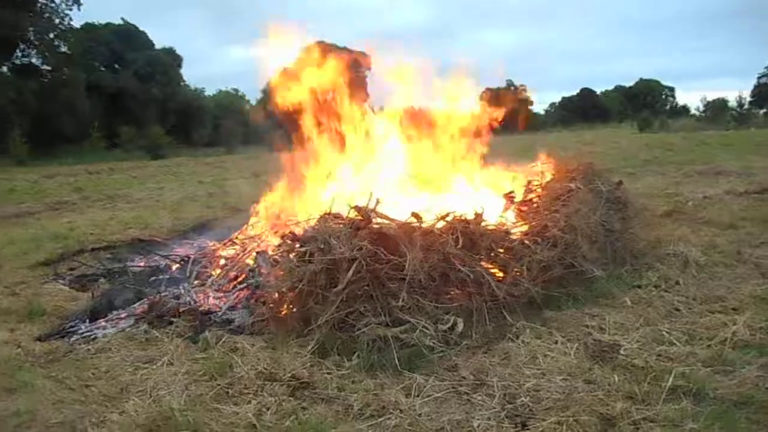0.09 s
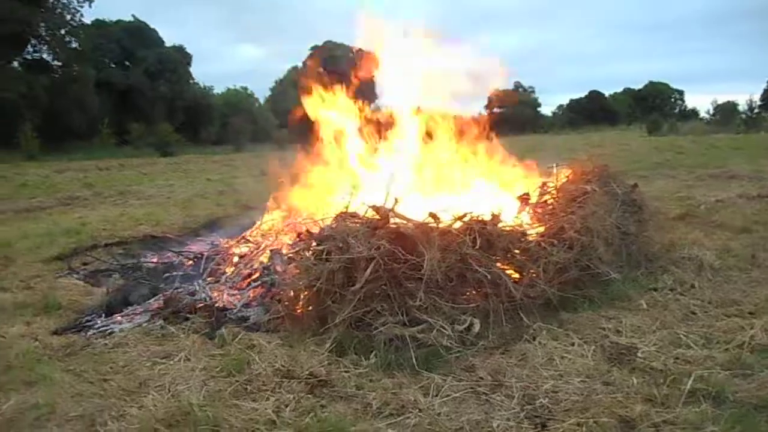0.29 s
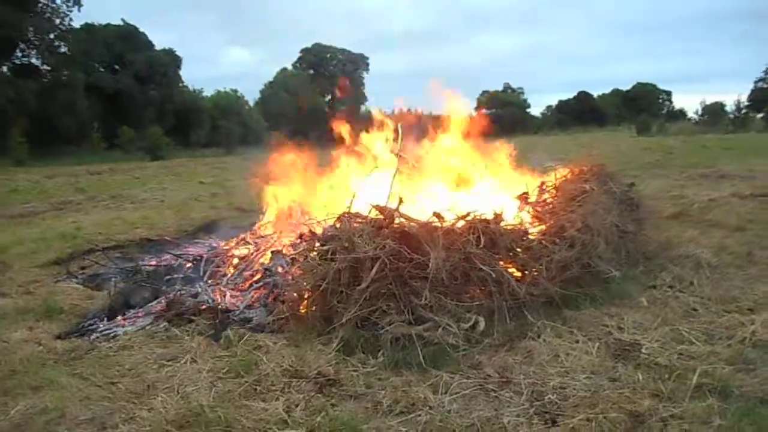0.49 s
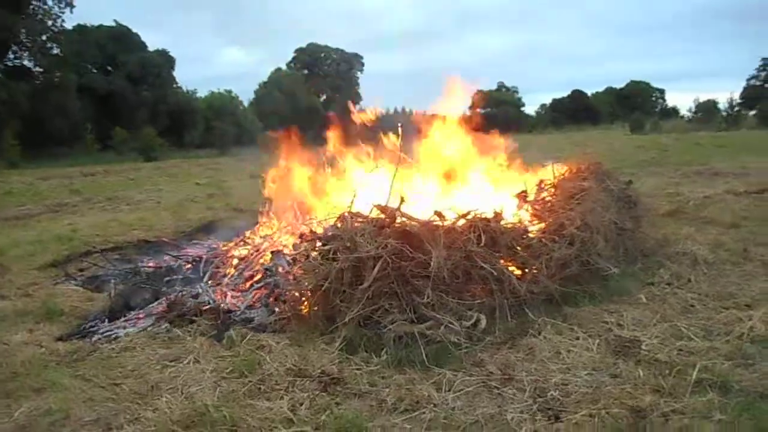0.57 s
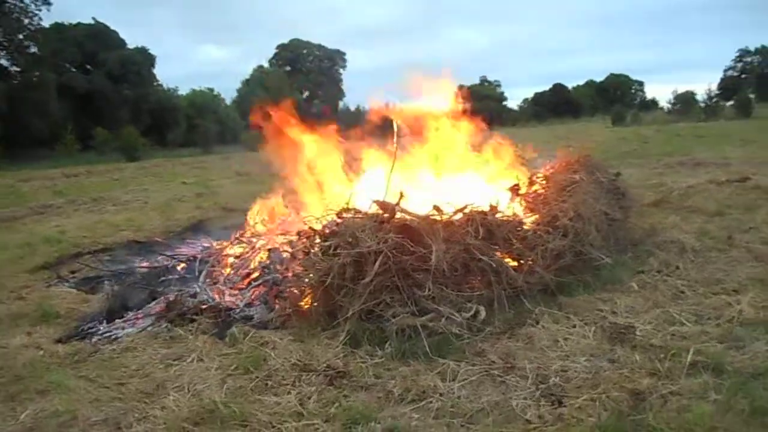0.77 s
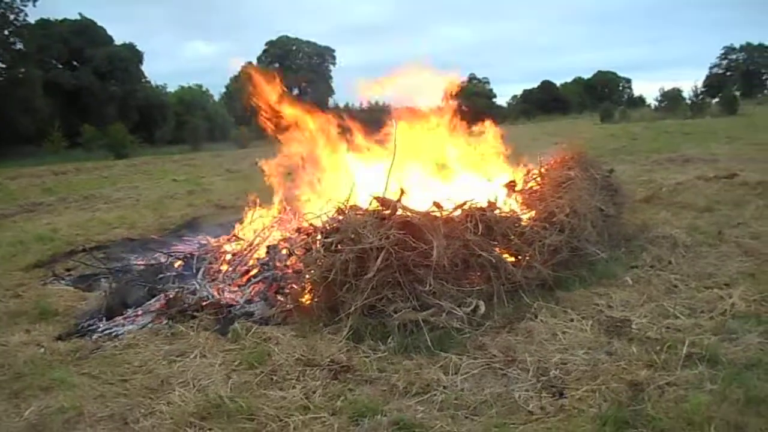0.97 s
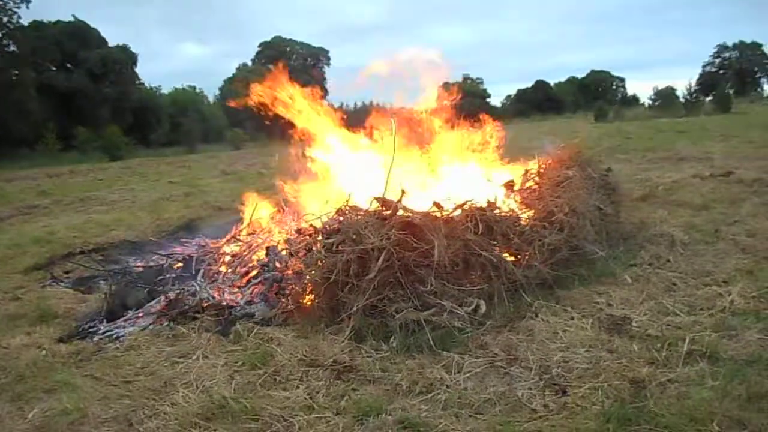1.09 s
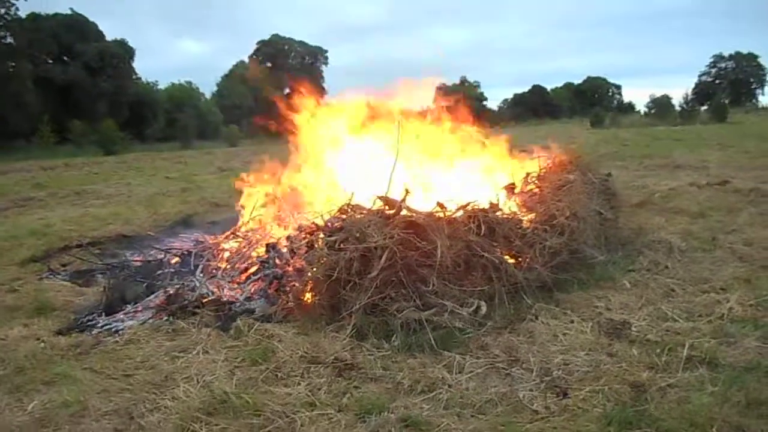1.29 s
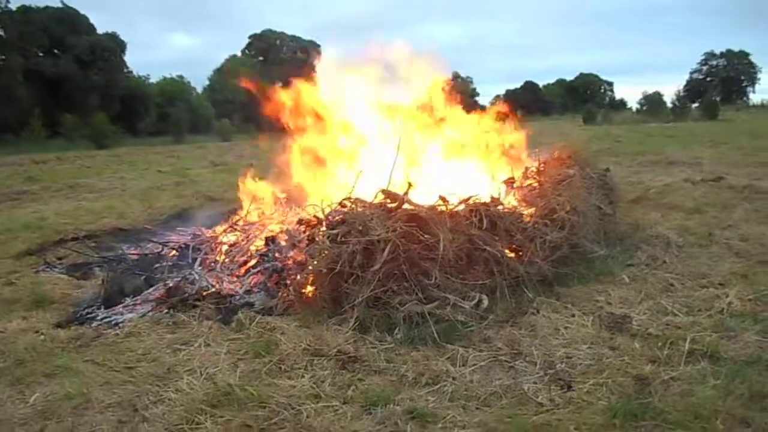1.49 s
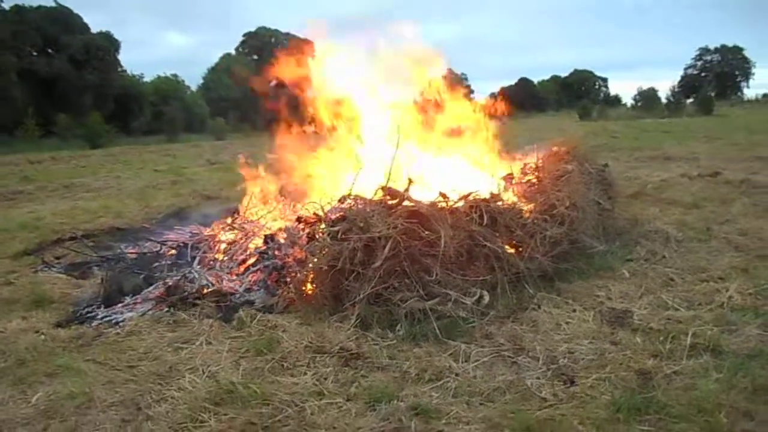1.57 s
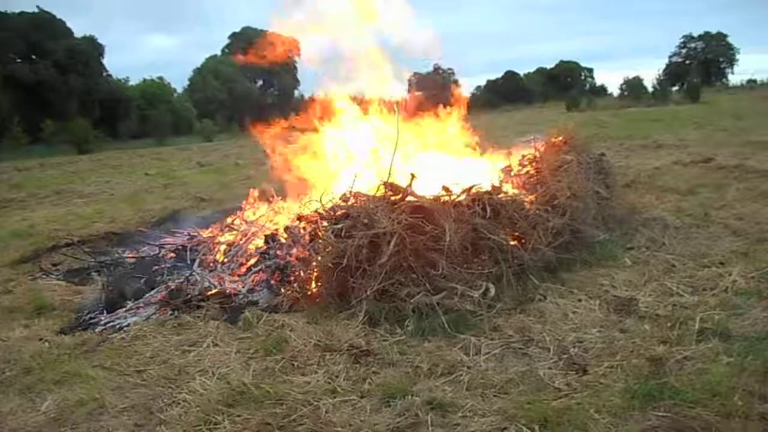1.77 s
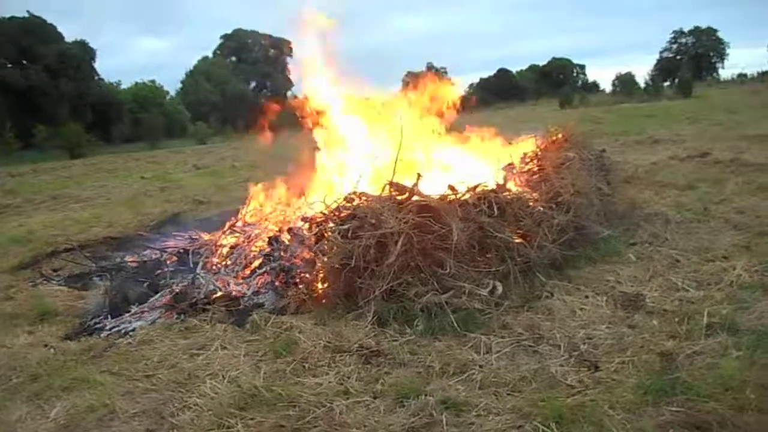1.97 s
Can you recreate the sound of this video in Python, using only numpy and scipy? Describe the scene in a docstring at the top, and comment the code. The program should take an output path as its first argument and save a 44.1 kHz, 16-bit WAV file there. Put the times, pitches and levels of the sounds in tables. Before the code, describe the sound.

A brushwood bonfire crackles close by in an open field for about two seconds. Fine random ticks run throughout over a faint steady hiss and low uneven flutter. Medium snaps come at 0.22 and 0.3, the loudest crack at 0.43, another at 0.6, a strong double snap near 0.95, soft low flame puffs around 1.1, a loud pop at 1.5, then smaller pops to the end. Dry, mono, muted extreme treble.

```python
"""Brushwood fire in an open field

A heap of dry brushwood burns a few metres from a small camera and its microphone.
The flames are shaped noise: a hiss with moving treble, an uneven low flutter, and soft puffs as short low tones.
Hollow stems burst with short ringing pops: a burst and tearing fibres excite resonances, twigs scatter them
into a tail and the ground returns them late. Countless faint crackles, made the same way, fall at random."""
import sys
import numpy as np
from scipy import signal
from scipy.fft import rfft, irfft
from scipy.io import wavfile
from scipy.ndimage import uniform_filter1d

SR = 44100
rng = np.random.default_rng(int(sys.argv[2]) if len(sys.argv) > 2 else 0)


def undo_db(level):
    """Turn decibels back into plain size, where 20 dB means ten times bigger."""
    steps = np.asarray(level, float) / 20
    return 10 ** steps


def log_audio(samples):
    """Write samples as a 16-bit WAV file to the path given in sys.argv[1]."""
    # one column per channel
    frames = np.atleast_2d(samples).T
    # limit to full scale, then quantise
    limited = np.clip(frames, -1, 1)
    pcm = np.round(limited * 32767).astype(np.int16)
    wavfile.write(sys.argv[1], SR, pcm)


N = 90405  # length in samples


def coloured(points):
    """Noise of rms 1 whose spectrum follows the points (f/Hz, level/dB)."""
    hz, db = np.array(points).T
    f = np.maximum(np.arange(N // 2 + 1) * SR / N, 1)
    gain = undo_db(np.interp(np.log(f), np.log(hz), db))
    x = irfft(rfft(rng.standard_normal(N)) * gain, N)
    return x / x.std()


def walk(rate):
    """Random levels held 1 / rate s and slewed twice; spread near 1."""
    hold = int(SR / rate)
    steps = np.repeat(rng.standard_normal(N // hold + 1), hold)
    slewed = uniform_filter1d(uniform_filter1d(steps, hold), hold)
    return 1.3 * slewed[:N]


# Spectrum of the flame hiss, relative: f/Hz, level/dB (per Hz)
HISS_SPECTRUM = [(150, 8), (250, -15.5), (387, -6), (858, 4.5), (1550, -2.5), (3550, -4), (5670, -10.5),
                 (8250, -16), (9800, -20), (10400, -34), (13600, -62), (22000, -120)]
# Course of the hiss, before its random wander: t/s, level/dB, lift of the treble/dB
HISS_COURSE = [(0.0, -50.5, 1.5), (0.27, -49.5, 2), (0.76, -49.5, 0.5), (1.13, -48, 1.5), (2.05, -49, -0.5)]
TREBLE_FROM_HZ = 4500
HISS_WALK_DB, HISS_WALK_PER_S = 0.8, 25.94


def hiss():
    """Burning gas as steady noise; the treble swells and sinks apart from the whole."""
    t = np.arange(N) / SR
    at, level_db, lift_db = np.array(HISS_COURSE).T
    noise = coloured(HISS_SPECTRUM)
    high_pass = signal.butter(2, TREBLE_FROM_HZ, "high", fs=SR, output="sos")
    treble = signal.sosfiltfilt(high_pass, noise)
    lifted = noise + (undo_db(np.interp(t, at, lift_db)) - 1) * treble
    return lifted * undo_db(np.interp(t, at, level_db) + HISS_WALK_DB * walk(HISS_WALK_PER_S))


# Spectrum of the low flutter, relative: f/Hz, level/dB (per Hz)
FLUTTER_SPECTRUM = [(12, -25), (20, -7), (92, -3), (350, -7), (460, -50), (770, -120)]
# Course of the flutter: t/s, level/dB
FLUTTER_COURSE = [(0.0, -59.5), (0.42, -62), (1.2, -57.5), (1.58, -64.5), (2.05, -59.5)]
FLUTTER_WALK_DB, FLUTTER_PER_S = 3, 21


def flutter():
    """Low noise of the flames, made uneven by random gusts of rms 1."""
    gusts = undo_db(FLUTTER_WALK_DB * walk(FLUTTER_PER_S))
    uneven = coloured(FLUTTER_SPECTRUM) * gusts / np.sqrt(np.mean(gusts ** 2))
    return uneven * undo_db(np.interp(np.arange(N) / SR, *np.array(FLUTTER_COURSE).T))


# Puffs of flame: t/s (middle), peak level/dB, f/Hz, length/s (middle to 1/e)
PUFF_TABLE = [(.355, -48, 69.4, .008), (.42, -50, 70.4, 0.0066), (.603, -45.5, 46, 0.011),
              (.785, -50.5, 43.8, 0.013), (.99, -43, 120, 0.004), (1.054, -40.5, 131, 0.0039),
              (1.12, -43, 90, 0.012), (1.136, -34, 110, 0.0028), (1.175, -48, 180, 0.0054),
              (1.599, -36, 122, 0.0029)]


def puffs():
    """Soft puffs of flame: each a low tone under a bell-shaped swell."""
    out = np.zeros(N)
    for s, db, hz, length in PUFF_TABLE:
        u = np.arange(N) / SR - s
        out += undo_db(db) * np.exp(-(u / length) ** 2) * np.cos(2 * np.pi * hz * u)
    return out


def flames():
    """Hiss, flutter and puffs of the flames together."""
    return hiss() + flutter() + puffs()


def hump(hz, q):
    """Power of a steep-skirted resonance over the bins of one pop, summing to 1."""
    f = np.maximum(np.arange(1025), .5) * SR / 2048
    p = (1 + (q * (f / hz - hz / f)) ** 2) ** -2.
    return p / p.sum()


def causal(power):
    """Minimum-phase response with this power spectrum, by folding its cepstrum."""
    cepstrum = irfft(np.log(power + 1e-12) / 2)
    cepstrum[1:1024] *= 2
    cepstrum[1025:] = 0
    return np.exp(rfft(cepstrum))


BASS_HZ, BASS_Q, LOW_Q, HIGH_Q, AIR_HZ, AIR_Q = 653, 0.35, 1.58, 2, 8800, 0.88
FIBRES_PER_MS, FIBRE_DB, FIBRE_SCATTER_DB = 6, -6.5, 4  # rate at random; level against the burst
TWIGS_DB, TWIGS_T60_MS = -10.5, 27.2
CREST = 1.5  # divides the level once the loudest 1 ms is scaled as a sine of peak 1


def pop(db, low_hz, high_hz, high_db, bass_db, air_db, tear_ms):
    """One burst and a spray of tearing fibres ring the stem; twigs scatter it into a short tail."""
    ms = np.arange(2048) * 1000 / SR
    pick, size, spray = rng.random(len(ms)), rng.standard_normal(len(ms)), rng.standard_normal(len(ms))
    torn = pick < FIBRES_PER_MS * ms[1]
    fibres = np.sign(spray) * torn * undo_db(FIBRE_DB + FIBRE_SCATTER_DB * size)
    push = fibres * np.exp(-(ms / tear_ms) ** 3)
    push[0] = -1  # the burst itself
    push = rfft(np.roll(push, 44))  # 1 ms of lead
    push = push / np.sqrt(uniform_filter1d(np.abs(push) ** 2, size=30))  # evenly white: the stem gives the colour

    stem = hump(low_hz, LOW_Q)
    stem = stem + undo_db(2 * high_db) * hump(high_hz, HIGH_Q)  # doubled dB: these are powers
    stem = stem + undo_db(2 * bass_db) * hump(BASS_HZ, BASS_Q)
    stem = stem + undo_db(2 * air_db) * hump(AIR_HZ, AIR_Q)
    body = irfft(push * causal(stem))

    twigs = spray * undo_db(-60 * ms / TWIGS_T60_MS)
    twigs = twigs / np.sqrt(np.sum(twigs ** 2))
    x = body + undo_db(TWIGS_DB) * signal.fftconvolve(body, twigs)[:len(ms)]
    loudest = np.sqrt(2 * uniform_filter1d(x ** 2, size=44).max())  # over 1 ms
    return undo_db(db) * x / loudest / CREST


def add(out, x, s):
    """Mix x into out from time s."""
    i = max(int(round(s * SR)), 0)
    out[i:i + len(x)] += x[:max(len(out) - i, 0)]


# Stems bursting: t/s, nominal peak level/dB, low ring f/Hz, high ring f/Hz,
# then against the low ring: high ring level/dB, bass level/dB, treble level/dB; last, tearing time/ms
POP_TABLE = [(0.0074, -27.5, 2750, 4400, -6, -17, -6, 2), (0.0769, -30, 2110, 4000, 0, -7, -7, 1.2),
             (0.129, -27, 1810, 4640, 3.5, -19, 2, 1.1), (0.15, -22.5, 3050, 4620, -3, -15, -4, 1.65),
             (0.178, -30.5, 1380, 4080, 1, -16, -5, 3.1), (0.2223, -15, 3030, 6760, 3, -14.5, -8, 2.5),
             (0.247, -33, 1700, 3810, -5, -17, -20, 2), (0.2668, -29, 2030, 5250, -1.5, -14, -6.5, 1.8),
             (0.2988, -13, 2120, 5130, -2.5, -13.5, -13.5, 1.65),
             (0.349, -26, 3400, 5200, -5, -15, -16, 2.6), (0.3746, -32.5, 3500, 4530, 6, -17, -10, 2.6),
             (0.427, 1, 3140, 6120, -6.5, -15, -14, 2.34), (0.4467, -24.5, 3550, 3880, -2, -17, -14, 1.9),
             (0.4562, -29.5, 3030, 3800, -10, -15, -16, 2.6), (0.4889, -32, 1420, 5540, 1.5, -15, -10, 2.2),
             (0.5027, -26.5, 3070, 5300, 0.5, -17, -5, 2.2), (0.5253, -36, 3560, 3860, 11, -14, -11, 2.2),
             (0.5944, -9.5, 2820, 6100, -2.5, -14, -6, 1.4), (0.63, -22.5, 1340, 6140, -4, -10, -14.5, 1.6),
             (0.642, -22.5, 2180, 5600, -1, -14, -12, 1.63), (0.6716, -23, 3080, 3820, -24, -11, -24, 2.5),
             (0.785, -17, 1460, 6200, 1.5, -11, -15, 2.3),
             (0.7963, -17.5, 3200, 3860, -10, -19, -13.5, 1.4),
             (0.8042, -30, 2800, 3800, -0.5, -16, -13, 1.7),
             (0.8061, -20.5, 3300, 3940, -13, -9.5, -13.5, 2.5),
             (0.9542, -10.5, 3430, 3800, -15, -18, -12.5, 1.5),
             (0.9557, -3.5, 2260, 4810, -5, -19.5, -22, 2.12), (0.9811, -31.5, 2980, 5130, -8, -14, -14, 2),
             (0.992, -25.5, 2860, 4060, -15.5, -17, -22, 1.9),
             (1.0661, -30.5, 1950, 5400, -0.5, -5, -9, 2.5), (1.1295, -33, 1360, 3880, 0.5, -18, -8, 2.2),
             (1.1425, -30, 2590, 3770, -10, -20, -14, 2.2), (1.1803, -20.5, 3080, 5750, 2, -9, -9, 1.7),
             (1.206, -18.5, 2720, 3950, -6.5, -16, -10.5, 3.2),
             (1.2245, -30.5, 3240, 5080, -10, -10, -8, 2.5),
             (1.2426, -33.5, 1280, 4180, -14, -17, -14, 1.4), (1.254, -27, 2830, 4850, -1.5, -17, -6, 1.96),
             (1.289, -31, 3300, 6780, -2, -19, -13.5, 2.8), (1.2949, -30.5, 1850, 4620, 4, -17, -11, 2.2),
             (1.3191, -32, 3290, 4330, 3, -17, -13, 2.7), (1.3469, -30.5, 2540, 4750, -1, -20, -8, 2),
             (1.3767, -25.5, 2620, 5720, -3, -20, -12, 1.8), (1.4072, -30, 2120, 3850, 8, -17, -9, 1.8),
             (1.4943, -2, 2510, 4630, 0, -15.5, -6.5, 1.77), (1.519, -31.5, 3560, 5100, 4, -19, -13, 2.2),
             (1.5499, -16.5, 2840, 4000, -2.5, -9, -3, 1.2), (1.5639, -16.5, 1640, 3920, 3, -17, -2.5, 1.4),
             (1.6181, -14.5, 3860, 4330, -11, -14.5, -24, 2.3),
             (1.6391, -31, 2100, 4070, 0.5, -15, -15, 2.7), (1.717, -27.5, 2240, 4680, -6.5, -6, -9, 2.5),
             (1.735, -33, 2790, 4140, -12, -13, -15, 2.6),
             (1.7837, -16.5, 1850, 3560, -4.5, -9.5, -34, 2.7),
             (1.7891, -19, 2620, 3600, -23, -13.5, -29, 3.1),
             (1.8014, -29.5, 1690, 3770, -14, -24, -16, 2.8), (1.809, -21, 1560, 4140, -31, -20, -29, 3.5),
             (1.903, -25.5, 3450, 4120, -5.5, -5.5, -7, 1.7), (1.936, -26, 2110, 3880, -4.5, -15, -14, 2.4)]


def pops():
    """The loud bursts of hollow stems, each ringing at its own pitches."""
    out = np.zeros(N)
    for s, *stem in POP_TABLE:
        add(out, pop(*stem), s)
    return out


# faint crackle: rate, level of the faintest, how far others rise above it, range of the low ring
CRACKLE_PER_S, CRACKLE_FAINTEST_DB, CRACKLE_SPREAD_DB, CRACKLE_HZ = 90, -46.5, 4, (1207, 3670)


def crackle():
    """Small twigs and leaves ticking at random all over the heap, as tiny pops."""
    out, s = np.zeros(N), 0
    lo, hi = CRACKLE_HZ
    for gap, loud, pitch, bright, tear in rng.random((400, 5)):
        s -= np.log(1 - gap) / CRACKLE_PER_S
        if s < N / SR:
            db = CRACKLE_FAINTEST_DB - CRACKLE_SPREAD_DB * np.log(1 - .95 * loud)
            hz = lo * (hi / lo) ** pitch
            high_db, air_db = -9 + 12 * bright, -16 + 12 * bright
            tick = pop(db, hz, 2.1 * hz, high_db, -9, air_db, .4 + 4.5 * tear)
            add(out, tick, s)
    return out


GROUND_S, GROUND_DB = 0.001335, -18.5  # delay and level of the ground reflection


def scene():
    """Bursts and crackle arrive direct and again off the ground, over the flames."""
    steady = flames()
    wood = pops() + crackle()
    lag = int(GROUND_S * SR)
    ground = np.concatenate([np.zeros(lag), wood[:-lag]])
    wood = wood + undo_db(GROUND_DB) * ground
    return (wood + steady)[None]


def low_pass(x):
    """Removes everything above the highest recorded frequency."""
    return signal.sosfilt(signal.butter(12, 10580, fs=SR, output="sos"), x)


CEILING, TOP_HZ = .75, 9005  # full-scale limit of the rounding; upper corner


def record(dry):
    """The camera rounds the tallest peaks and cuts the top steeply."""
    rounded = CEILING * np.tanh(dry / CEILING)
    mix = signal.sosfilt(signal.butter(8, TOP_HZ, fs=SR, output="sos"), rounded)
    return low_pass(mix)


dry = scene()
out = record(dry)
log_audio(out)
```